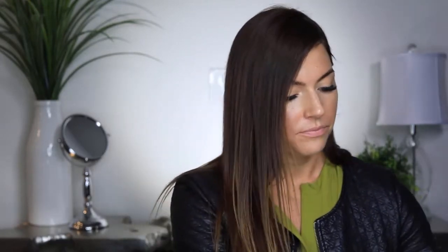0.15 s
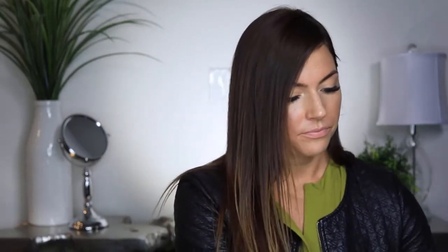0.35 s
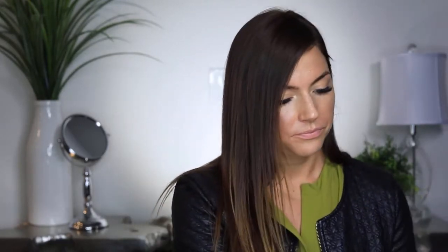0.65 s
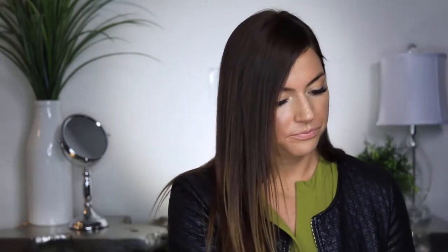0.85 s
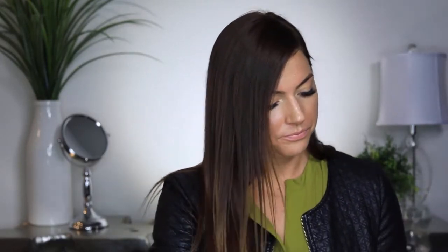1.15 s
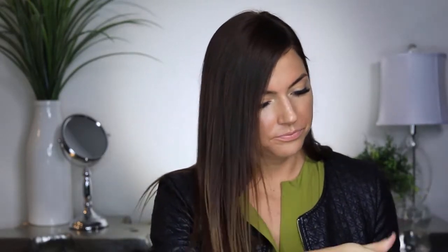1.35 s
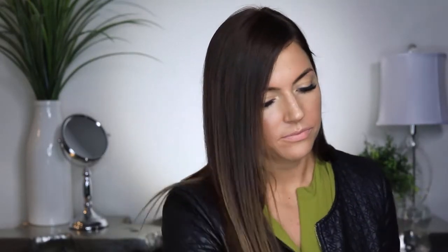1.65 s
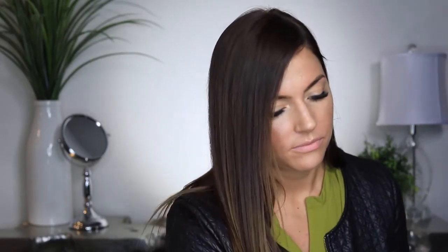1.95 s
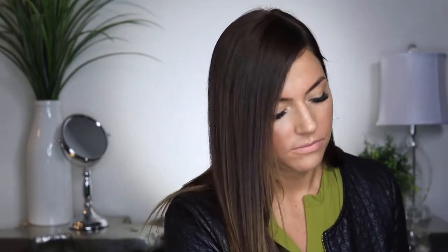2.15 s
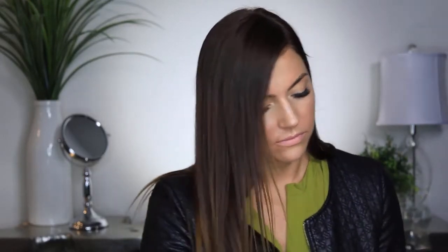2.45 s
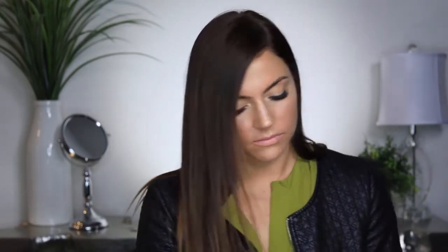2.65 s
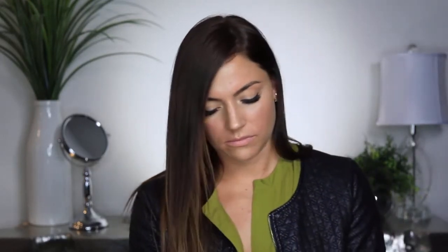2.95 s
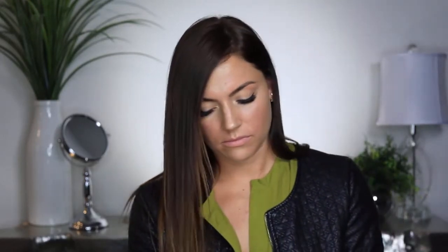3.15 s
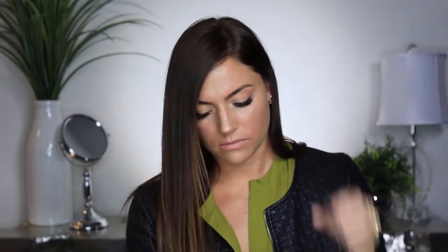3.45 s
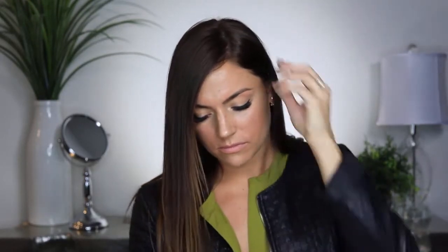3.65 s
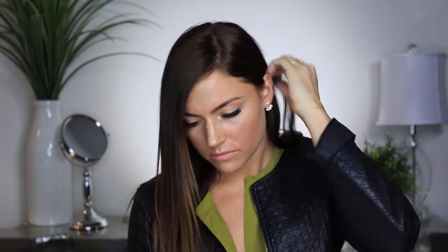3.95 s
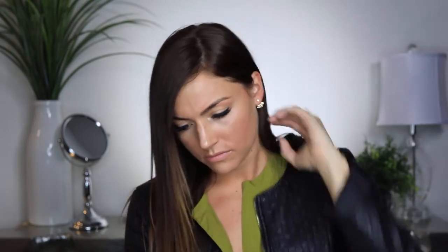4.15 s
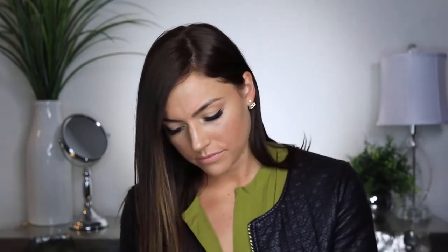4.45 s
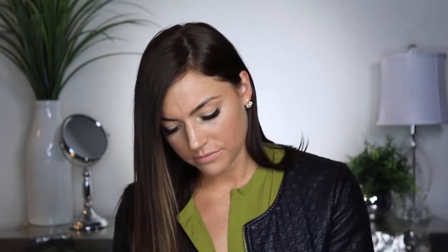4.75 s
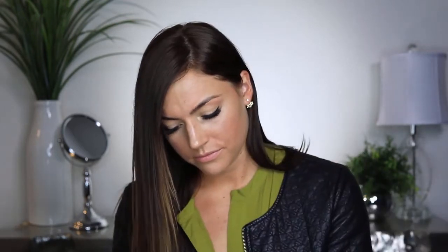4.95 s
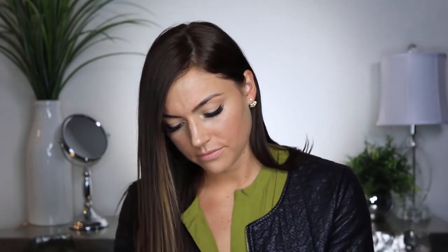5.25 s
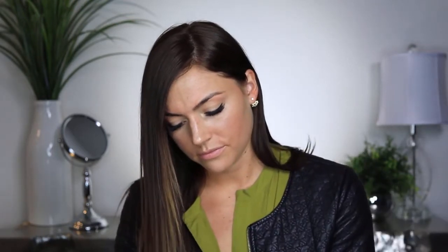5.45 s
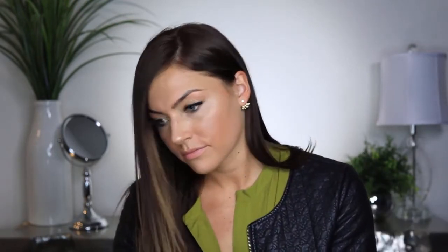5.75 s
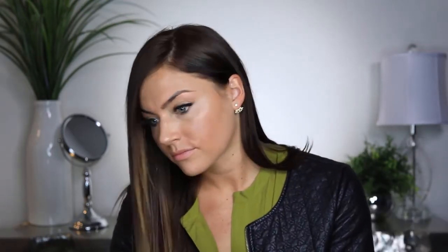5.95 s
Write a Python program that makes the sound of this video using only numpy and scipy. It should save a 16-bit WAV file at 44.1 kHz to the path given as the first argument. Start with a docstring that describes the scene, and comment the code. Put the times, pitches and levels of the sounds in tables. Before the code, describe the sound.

A small quiet room with a low, gently wavering ventilation hum and faint hiss, microphone about a metre away. At once a firm plastic case knocks the table, with short gritty slides and hollow cap ticks, another knock at 0.2 s, and a strong clack with scraping at 0.4-0.55 s. A flurry of softer knocks and a slide runs from 0.75 to 0.95 s, with a double click near 1.2 s. Fabric or bristles rustle softly from 1.25 to 1.75 s, with small bumps at 1.7-1.8 s. A compact lid clicks brightly at 2.16 s, with smaller clicks to 2.3 s. Light plastic and cap ticks cluster at 3.05-3.25 s, then faint metallic pings at 3.35 s. After a near-still pause with faint rustling, dull fingertip taps come at 4.5-4.9 s, tiny dry clicks at 5.3-5.95 s, and a last soft tap at 6.07 s.

```python
"""Cosmetics on a table

A small quiet room, microphone a metre or so away, as cosmetics are sorted on a table top.
Plastic cases knock and slide: blows and friction ring the damped modes of table and case.
A compact, hollow cap, brush and fingertips tap with modes and noise; a sleeve rustles in swelling noise.
Behind them lie a low ventilation hum and microphone hiss, both shaped noise with wavering hum lines."""
import sys
import numpy as np
from scipy import signal
from scipy.fft import rfft, irfft, next_fast_len
from scipy.io import wavfile
from scipy.ndimage import uniform_filter1d

SR = 44100
rng = np.random.default_rng(int(sys.argv[2]) if len(sys.argv) > 2 else 0)


def to_wav(s):
    """Save 16-bit WAV."""
    ch = np.atleast_2d(s).T  # columns
    pcm = np.round(np.clip(ch, -1, 1) * 32767)  # PCM
    wavfile.write(sys.argv[1], SR, pcm.astype(np.int16))


N = 268569  # samples
RING_S = np.arange(SR // 4) / SR  # time axis of one short sound


def undb(db):
    """Decibels to gain."""
    return 10 ** (np.asarray(db) / 20)


def unit(x):
    """Scale to rms 1."""
    return x / np.sqrt(np.mean(x ** 2))


def strike(x, db, size=128):
    """Scale a blow so that the rms of its loudest 3 ms has this level."""
    return x * undb(db) / np.sqrt(uniform_filter1d(x ** 2, size).max())


def add(track, s, x):
    """Mix a short sound in at time s."""
    i = int(np.clip(s * SR, 0, N - 1))
    track[i:i + len(x)] += x[:N - i]


def band(x, lo_hz, hi_hz, order=2):
    """Causal band-pass."""
    edges = np.clip([lo_hz, max(hi_hz, lo_hz + 20)], 10, [SR / 2 - 2000, SR / 2 - 1000])
    return signal.sosfilt(signal.butter(order, edges, "band", fs=SR, output="sos"), x)


def on_log_axis(hz, points):
    """Read (Hz, value) points along a log-frequency axis."""
    f, value = np.transpose(points)
    return np.interp(np.log(hz + 1), np.log(f), value)


def fade(t60, t=RING_S):
    """Exponential decay, 60 dB down after t60 seconds."""
    return undb(-60 * t / max(t60, .001))


def walk(rate):
    """Slow chance: random levels held 1 / rate s, slewed twice, at rms 1."""
    hold = int(SR / rate)
    steps = np.repeat(rng.standard_normal(N // hold + 1), hold)
    return unit(uniform_filter1d(uniform_filter1d(steps, hold), hold)[:N])


def burst(t60):
    """Dense, quickly dying vibration."""
    return rng.standard_normal(len(RING_S)) * fade(t60)


def ring(modes, scatter_db):
    """Damped modes; each place of contact weights and detunes them a little."""
    hz, db, t60 = np.transpose(modes)
    weight, detune = rng.standard_normal((2, len(hz)))
    gain = undb(db + scatter_db * weight) * (-1) ** np.arange(len(hz))
    hz = hz * (1 + .008 * detune)
    return sum(g * np.sin(2 * np.pi * f * RING_S) * fade(t) for g, f, t in zip(gain, hz, t60))


def chatter(x, rough, t60):
    """A hard contact is one blow followed by a spray of tiny rebounds."""
    spray = burst(t60)
    spray /= np.linalg.norm(spray)
    return x + rough * signal.fftconvolve(x, spray)[:len(x)]


# Spectral shape of the still room: (f/Hz, relative level/dB)
AIR_SHAPE = [(20, -9.5), (32, -36), (48, -19.5), (72, -7), (95, -11), (122, -2), (190, -9.5), (350, -16),
             (550, -22), (1300, -28), (2200, -33), (4600, -37), (9000, -40), (15700, -41)]
# Hum lines under it: (f/Hz, rms level/dB)
HUM_LINES = [(80, -81.5), (118, -66), (133, -72.5), (361, -78)]


def still_room(air_db=-61.5, waver=0.68):
    """Ventilation rumble with wavering hum lines, and microphone hiss."""
    size = next_fast_len(N)
    colour = undb(on_log_axis(np.arange(size // 2 + 1) * SR / size, AIR_SHAPE))
    air = unit(irfft(rfft(rng.standard_normal(size)) * colour, size)[:N])
    out = undb(air_db) * air
    phase = 2 * np.pi * np.arange(N) / SR
    for hz, db in HUM_LINES:
        in_phase = (1 + waver * walk(9)) * np.sin(hz * phase)
        quadrature = waver * walk(6.6) * np.cos(hz * phase)
        out += undb(db) * unit(in_phase + quadrature)
    return out


# Decay of the small room: (f/Hz, t60/s)
ROOM_DECAY = [(150, 0.91), (400, 0.26), (1000, 0.46), (2800, 0.34), (8000, 0.47)]


def room(x, wet_db=-5.5, build_s=0.0067, dull_hz=8000):
    """A diffuse tail builds up after the blow, softer in the treble, each band with its own decay."""
    t = np.arange(SR * 2 // 3) / SR
    tail = np.zeros(len(t))
    for hz in np.geomspace(SR / 512, SR / 4, 8):
        octave = band(rng.standard_normal(len(t)), hz / np.sqrt(2), hz * np.sqrt(2), order=3)
        tail += octave * fade(on_log_axis(hz, ROOM_DECAY), t) / np.hypot(1, hz / dull_hz)
    tail *= 1 - np.exp(-(t / build_s) ** 2)
    tail /= np.linalg.norm(tail) * np.sqrt(SR / 2 / dull_hz)
    return undb(wet_db) * signal.fftconvolve(x, tail)[:N]


# Sleeve and bristles brushing past: (start t/s, end t/s, rms level before the swell/dB, centre f/Hz)
SWISHES = [(0.135, 0.184, -66.5, 4750), (0.23, 0.28, -71, 4300), (0.688, 0.773, -71.5, 6530),
           (0.81, 0.896, -69, 3240), (1.17, 1.25, -67.5, 6860), (1.254, 1.45, -69.5, 3080),
           (1.45, 1.732, -63, 2100), (3.47, 3.832, -69.5, 1340), (3.962, 4.506, -75.5, 1650),
           (4.683, 4.723, -69.5, 3420), (5.039, 5.082, -66.5, 4270), (5.796, 5.824, -69.5, 2760)]


def swishes(spread=1.93, grain_db=1.0):
    """Fibres rub in a broad, slightly grainy hiss that swells and dies."""
    out = np.zeros(N)
    fibres = rng.standard_normal(N) * undb(grain_db * walk(270))
    for start, end, db, hz in SWISHES:
        i = int(start * SR)
        n = max(int((end - start) * SR), len(RING_S) // 20)
        hiss = unit(band(fibres[i:i + n], hz / spread, hz * spread))
        swell = np.sin(np.linspace(0, np.pi, n))
        add(out, start, undb(db) * hiss * swell)
    return out


def taps(events, modes, gain_db, soft_hz, grit_db):
    """Taps on one object; the contact adds a little grit, and a softer one takes away the upper modes."""
    out = np.zeros(N)
    for s, db in events:
        grit = undb(grit_db) * unit(band(burst(t60=0.088), 600, 3800, order=1))
        body = unit(ring(modes, scatter_db=3))
        add(out, s, strike(band(body + grit, 76, soft_hz, order=3), db + gain_db))
    return out


# The brush's metal ferrule pings: (t/s, level before gain_db/dB)
FERRULE_TAPS = [(3.330, -58), (3.380, -53.5)]
# Modes of the ferrule: (f/Hz, relative level/dB, t60/s)
FERRULE_MODES = [(4600, 0, 0.036), (5070, -6, 0.02)]


def ferrule_taps():
    """Small metal ferrule: two high, short-lived modes."""
    return taps(FERRULE_TAPS, FERRULE_MODES, gain_db=-3, soft_hz=12000, grit_db=-3.5)


# Soft fingertip taps: (t/s, level before gain_db/dB)
FINGER_TAPS = [(1.403, -48.5), (1.427, -51), (2.177, -52.5), (2.922, -46.5), (4.5375, -41), (4.612, -42.5),
               (4.726, -44.5), (4.865, -46), (5.293, -58.5), (5.929, -58), (6.071, -43.5)]
# Low modes of a fingertip tap: (f/Hz, relative level/dB, t60/s)
FINGER_MODES = [(177, -8.5, 0.02), (252, -3.5, 0.042), (319, -5.5, 0.017), (407, -4, 0.014),
                (491, -6.5, 0.026)]


def finger_taps():
    """A soft fingertip leaves only low, heavily damped modes."""
    return taps(FINGER_TAPS, FINGER_MODES, gain_db=-1.0, soft_hz=590, grit_db=-4.5)


# The hollow cap is touched, close by: (t/s, level/dB)
CAP_TAPS = [(0.1405, -46), (0.2159, -50), (0.4229, -45), (0.6115, -51.5), (0.6544, -53), (0.6642, -61),
            (3.1337, -47.5), (3.138, -42.5), (3.1955, -58), (3.2384, -65)]
# Modes of the cap: (f/Hz, relative level/dB, t60/s)
CAP_MODES = [(1383, -4.5, 0.0078), (1440, -3, 0.053), (1530, -14, 0.02), (2230, -16.5, 0.025),
             (4850, -29, 0.04)]


def cap_taps():
    """A hollow cap rings with little contact grit."""
    return taps(CAP_TAPS, CAP_MODES, gain_db=0, soft_hz=7000, grit_db=-24)


# The compact's lid is worked: (t/s, level before gain_db/dB)
LID_TAPS = [(2.161, -40), (2.166, -42), (2.187, -53), (2.202, -51), (2.2603, -45), (2.3022, -50)]
# Modes of the lid: (f/Hz, relative level/dB, t60/s)
LID_MODES = [(895, -3.5, 0.1), (1207, -11, 0.16), (2904, 2.5, 0.026), (3160, -4, 0.023), (5320, 4.5, 0.013),
             (5940, -8, 0.014), (8000, -19, 0.016), (8600, -11, 0.015)]


def lid_taps():
    """The compact's lid clicks: bright short modes over longer low ones."""
    return taps(LID_TAPS, LID_MODES, gain_db=-6.5, soft_hz=11900, grit_db=-9.5)


# Light clicks of plastic and brush handle:
# (t/s, level/dB, ring f/Hz, snap level against the noisy cluster/dB)
CLICKS = [(0.0103, -30, 2440, -30), (0.1415, -45.5, 2240, -27), (.379, -52.5, 2400, -14),
          (0.409, -46, 2680, -15), (0.8091, -45, 4100, -1), (.9557, -54, 2270, -10), (1.1237, -49, 3220, 2),
          (1.1887, -46, 2320, -18), (1.346, -51.5, 1950, -3), (1.4243, -55, 2170, -2),
          (2.303, -44.5, 4570, -15), (2.781, -53.5, 2810, -6), (2.8843, -54, 1480, -22),
          (3.048, -57.5, 2430, -8), (3.088, -45.5, 1850, -12), (3.0895, -50, 4460, -6),
          (3.12, -54, 2400, -14), (3.1287, -48.5, 1850, -18), (3.1386, -56, 2260, -17),
          (3.196, -54, 2100, -15), (3.237, -62, 2120, -15), (3.3305, -54, 1900, 8),
          (3.3796, -58.5, 2320, 5), (4.1526, -60.5, 1880, 6), (4.622, -57, 2940, -1),
          (4.7141, -56.5, 1463, -1), (5.174, -66, 2500, -11), (5.2954, -50.5, 2420, -18),
          (5.3164, -49, 1760, 11), (5.335, -69, 2300, -8), (5.4934, -51.5, 2590, -5),
          (5.504, -48, 1760, 7.5), (5.644, -55, 2430, -26), (5.652, -52, 2200, -1),
          (5.789, -57.5, 2280, -12), (5.9287, -57, 2460, -17), (5.9392, -54, 1700, 3)]
CLICK_CYCLES = 52.5  # cycles in which every click's ring dies by 60 dB


def clicks(spread=1.38, tone_db=-4):
    """Small stiff parts: a sharp snap, one damped mode and a cluster around it; higher ones die sooner."""
    out = np.zeros(N)
    for s, db, hz, snap_db in CLICKS:
        t60 = CLICK_CYCLES / hz
        cluster = strike(band(burst(t60), hz / spread, hz * spread), 0)
        tone = strike(ring([(hz, 0, t60)], scatter_db=0), tone_db)
        snap = strike(band(burst(t60=0.011), 1040, 3500, order=1), snap_db)
        add(out, s, strike(cluster + tone + snap, db))
    return out


# A slide starts quickly, loses this much level by its end as it slows, and stops
SLIDE_ATTACK_S, SLOWING_DB, SLIDE_STOP_T60_S = 0.01, 11.5, 0.33


def slide_force(start, length):
    """Friction of one slide: a quick start, a steady slowing, a stop."""
    age = np.maximum(np.arange(N) / SR - start, 0)
    attack = np.minimum(age / SLIDE_ATTACK_S, 1)
    slowing = undb(-SLOWING_DB * np.minimum(age / length, 1))
    return attack * slowing * fade(SLIDE_STOP_T60_S, np.maximum(age - length, 0))


# A case slides and comes to rest, before the slide's force and the gains below:
# (start t/s, length t/s, table rumble level/dB, case scrape level/dB)
SLIDES = [(0.013, 0.18, -44, -52), (.165, 0.038, -43.5, -56), (0.234, 0.13, -48, -56),
          (0.402, 0.11, -40, -47), (0.481, .13, -41, -51), (0.643, 0.036, -59, -53),
          (0.793, 0.19, -50.5, -55), (0.954, 0.044, -57, -53), (1.686, 0.17, -55.5, -60.5),
          (2.173, 0.77, -61.5, -66), (4.545, 0.41, -67, -79)]
# Modes of table top and case, rung by slides and knocks: (f/Hz, relative level/dB, t60/s)
TABLE_MODES = [(191, -0.5, 0.12), (243.6, -4.5, 0.097), (330.6, -1, 0.15), (400, 3.5, 0.046),
               (466, 5, 0.029), (553, 0, 0.049), (670, -10, 0.015), (789, 1, 0.051), (833, -2, 0.032),
               (1010, -2.5, 0.044), (1118, 1.5, 0.032)]
CASE_MODES = [(1240, -1, 0.026), (1518, 13, 0.014), (1688, -2, 0.03), (1842, -10, 0.11), (2210, -8, 0.026),
              (2310, -6, 0.025), (2553, -11, 0.076), (2680, -10, 0.016), (3320, -15, 0.019)]


def drag(rumble_db=-1, scrape_db=-1, grain_db=3, jerk_db=2.0):
    """Sliding is a dense run of uneven slips, bunched in jerks, that shake the table and the case."""
    slips = rng.standard_normal(N) * undb(grain_db * walk(350) + jerk_db * walk(70))
    table = unit(signal.fftconvolve(slips, ring(TABLE_MODES, scatter_db=0.5))[:N])
    rumble = unit(table + 1.22 * unit(band(slips, 252, 810)))
    case = unit(signal.fftconvolve(slips, ring(CASE_MODES, scatter_db=11))[:N])
    scrape = unit(.5 * case + unit(band(slips, 1260, 2660)))
    out = np.zeros(N)
    for start, length, low_db, high_db in SLIDES:
        sliding = undb(low_db + rumble_db) * rumble + undb(high_db + scrape_db) * scrape
        out += slide_force(start, length) * sliding
    return out


# Cases set down on the table: (t/s, table thud level/dB, case clack level/dB, edge tick level/dB)
KNOCKS = [(0.0108, -31, -33, -36.5), (0.018, -47, -51, -41), (0.2158, -35, -38.5, -55),
          (.4224, -44.5, -38, -67), (.4767, -31, -35, -45.5), (.490, -54, -39, -63), (.526, -41, -46, -70),
          (0.567, -51, -51, -76), (0.7568, -38, -48, -58), (.7795, -38.5, -49, -54.5),
          (0.8094, -42.5, -48, -50), (.823, -42, -51.5, -53), (.846, -41.5, -51, -59),
          (.891, -41, -55.5, -65), (.921, -46, -57, -61), (1.1841, -48.5, -49.5, -48.5),
          (1.191, -59, -44.5, -56), (1.427, -53, -65, -70), (1.7004, -45, -53, -78),
          (1.746, -50.5, -62, -72), (1.777, -53, -74, -65), (1.82, -51.5, -62, -64),
          (1.964, -54, -64.5, -70), (2.285, -56, -53.5, -70), (2.448, -54, -70, -72),
          (3.088, -54, -50.5, -54.5), (3.237, -63, -53.5, -71), (4.6136, -54, -59, -64)]
# A harder contact (more clack than thud) excites higher table modes:
# centre when both are equal, and dB of extra clack per octave
THUD_HZ, HARDNESS_DB_PER_OCTAVE = 657, 16.5


def knocks(thud_octaves=0.67):
    """Each knock gives the table top a dry push and rings it and the case, and the hard edge ticks."""
    out = np.zeros(N)
    for s, thud_db, clack_db, tick_db in KNOCKS:
        # heavy, soft contacts favour the table's low modes, light and hard ones its high modes
        centre_hz = THUD_HZ * 2 ** ((clack_db - thud_db) / HARDNESS_DB_PER_OCTAVE)
        top = []
        for hz, db, t60 in TABLE_MODES:
            octaves_off = np.log2(hz / centre_hz)
            loss_db = 10 * np.log10(1 + (octaves_off / thud_octaves) ** 4)
            top.append((hz, db - loss_db, t60))
        push = strike(band(fade(t60=0.0019), centre_hz / 1.57, centre_hz * 1.84), 0)
        boom = strike(chatter(ring(top, scatter_db=4.0), rough=0.26, t60=0.23), 0)
        add(out, s, strike(push + boom, thud_db))
        walls = ring(CASE_MODES, scatter_db=3)
        shell = unit(walls) + 0.73 * unit(band(burst(t60=0.078), 1060, 2500))
        add(out, s, strike(chatter(shell, rough=0.44, t60=0.017), clack_db))
        edge = band(burst(t60=0.017), 2560, 4570) + undb(-25) * band(burst(t60=0.054), 6300, 9200)
        add(out, s, strike(edge, tick_db))
    return out


def scene():
    """Everything handled sounds in the same small room; the cap is held close and stirs it less."""
    things = swishes() + ferrule_taps() + finger_taps() + lid_taps() + clicks() + drag() + knocks()
    cap = cap_taps()
    reverb = room(things + undb(-6.5) * cap)
    return (still_room() + reverb + cap + things)[None]


def record(dry, top_hz=15800):
    """The recorder cuts the very top with a steep low-pass."""
    return signal.sosfilt(signal.ellip(10, .1, 70, top_hz, fs=SR, output="sos"), dry)


dry = scene()
out = record(dry)
to_wav(out)
```